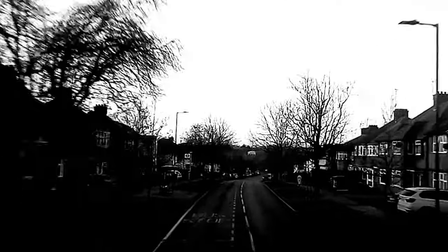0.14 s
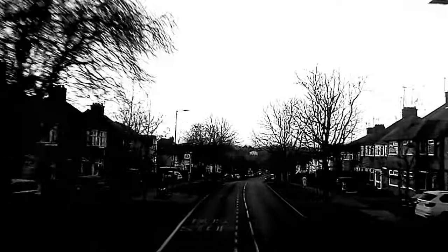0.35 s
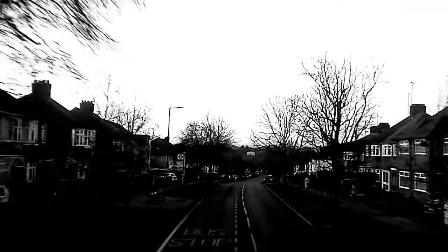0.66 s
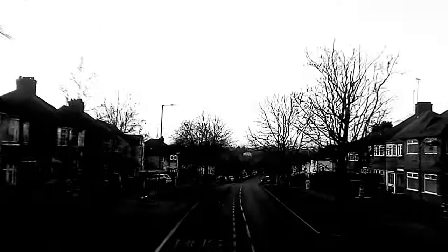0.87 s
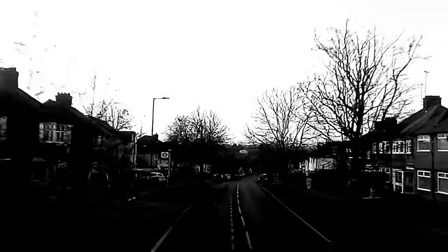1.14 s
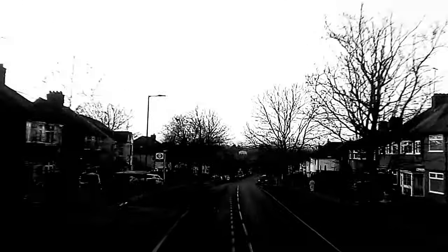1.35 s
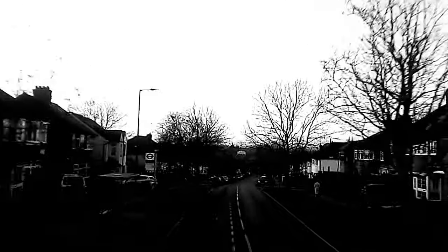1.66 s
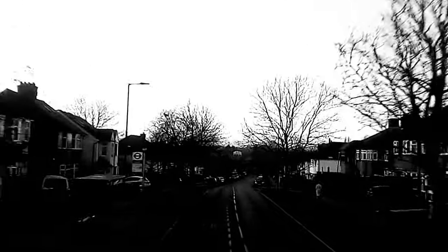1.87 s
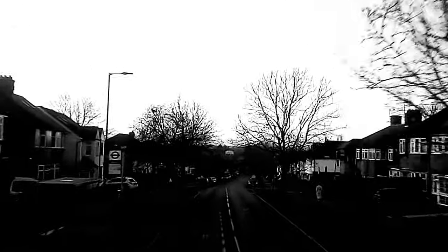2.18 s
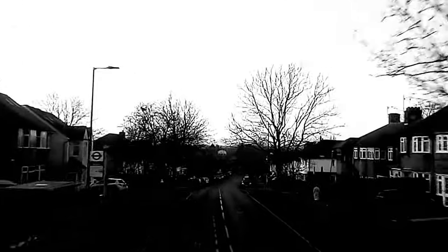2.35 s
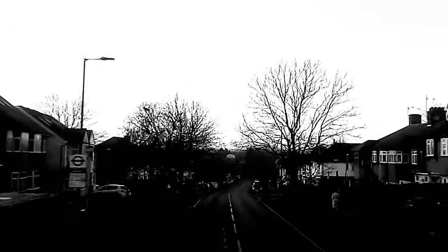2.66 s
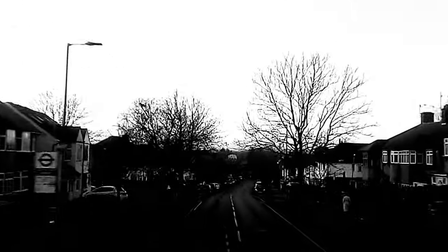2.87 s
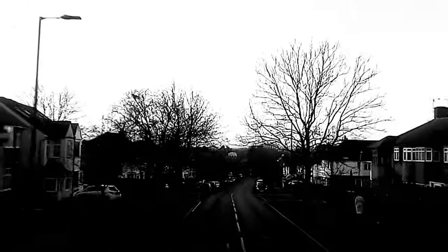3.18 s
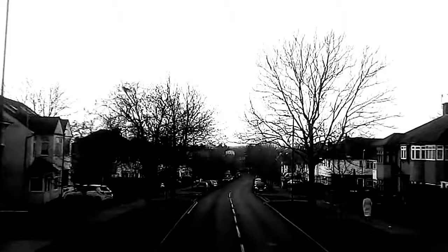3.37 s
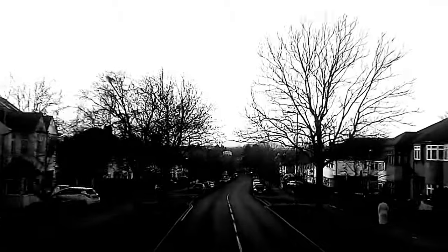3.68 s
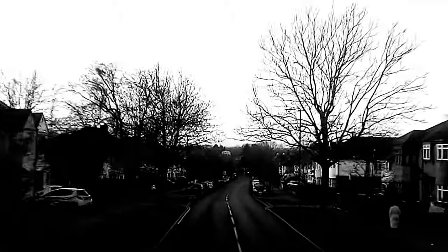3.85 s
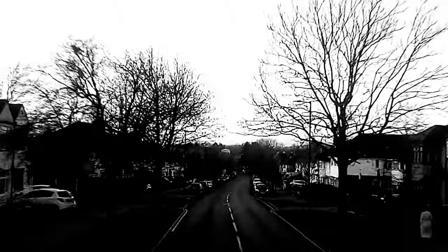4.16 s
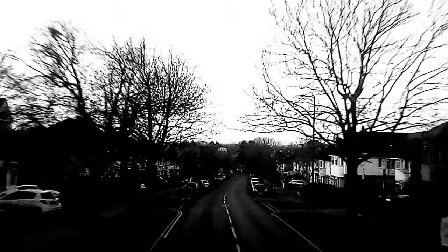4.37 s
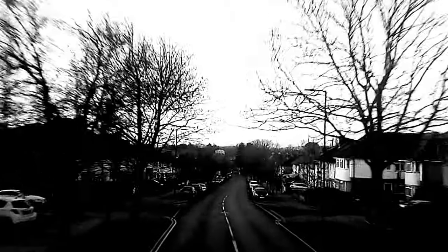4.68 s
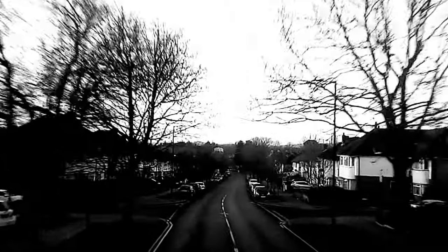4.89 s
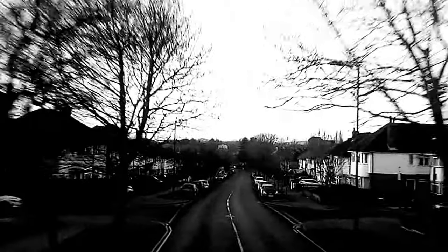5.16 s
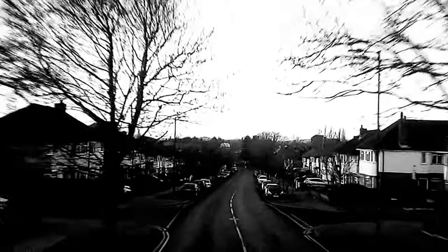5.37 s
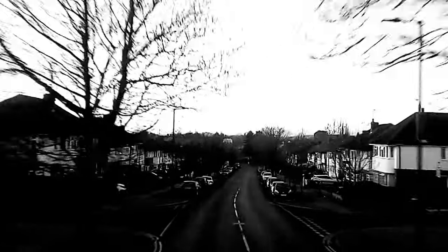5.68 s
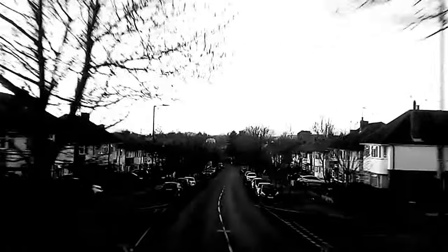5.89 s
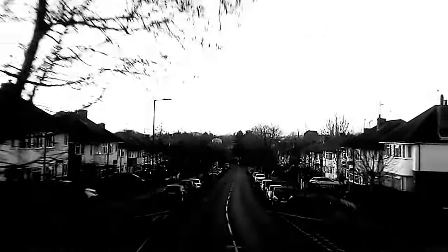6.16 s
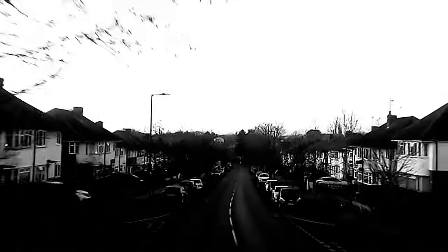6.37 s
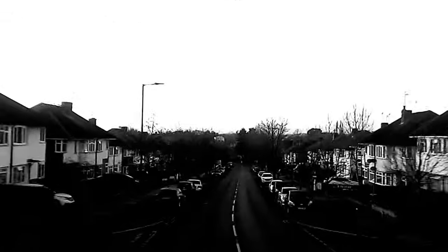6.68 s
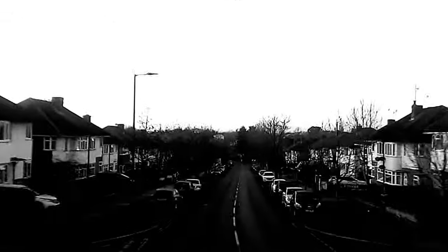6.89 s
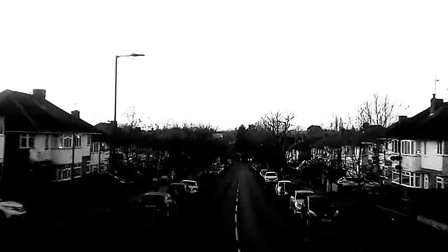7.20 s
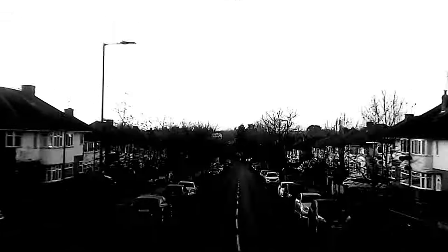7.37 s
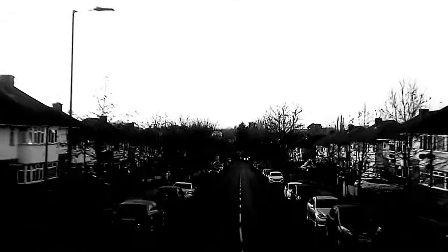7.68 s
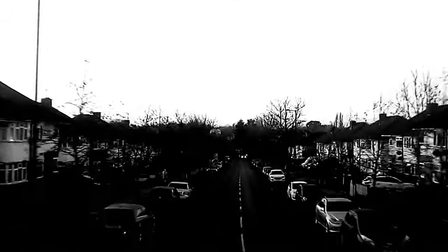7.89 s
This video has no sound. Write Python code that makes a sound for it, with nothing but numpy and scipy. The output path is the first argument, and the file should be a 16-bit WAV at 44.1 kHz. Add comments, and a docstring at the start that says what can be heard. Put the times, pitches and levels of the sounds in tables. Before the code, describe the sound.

A loose panel clatters in repeated bursts inside a moving double-decker bus, heard from the front seat of the upper deck. Each run of hollow knocks swells and fades, with light jiggling in the pauses. Underneath, the engine hums and the tyres rumble over rough asphalt. In the second half the drone grows and climbs a little as the bus gathers speed, and one bump brings a harder knock before the rattling carries on.

```python
"""Engine drone and tyre rumble upstairs in a double-decker bus gathering speed on a suburban road.
Firing orders sweep through body resonances under a gear hum; rough asphalt and bumps shake the cabin.
The body shudders about 12 times a second; strong shudders knock a loose panel against its frame,
echoing between the walls. Metal fittings chafe faintly over a thin hiss, and something ticks once."""
import sys
import numpy as np
from scipy import signal
from scipy.fft import rfft, irfft, next_fast_len
from scipy.io import wavfile
from scipy.ndimage import map_coordinates

SR = 44100
rng = np.random.default_rng(int(sys.argv[2]) if len(sys.argv) > 2 else 0)


def wav_record(signal):
    """Record a signal, one row per channel, as 16-bit PCM in the file named by sys.argv[1]."""
    frames = np.transpose(np.atleast_2d(signal))
    bounded = np.clip(frames, -1, 1)
    # unit amplitude maps onto the largest positive 16-bit level
    quanta = np.round(bounded * 32767).astype(np.int16)
    wavfile.write(sys.argv[1], SR, quanta)


N = 354563
T = np.arange(N) / SR

# engine firing rate: time_s, rate_hz
FIRING = [(0, 37.6), (1, 37.02), (2, 36.51), (3, 37.14), (4, 37.91), (4.5, 39.43), (5, 40.23), (5.5, 41.68),
          (6, 42.78), (6.5, 43.5), (8.04, 44.57)]


def amp(db):
    """dB to gain."""
    return 10 ** (np.asarray(db) / 20)


def unit(x):
    """Scale to rms 1."""
    return x / np.sqrt(np.mean(x ** 2) + 1e-20)


def along(points, hz):
    """Interpolate (freq_hz, value) rows on a log axis."""
    freq_hz, values = np.transpose(points)
    return np.interp(np.log(hz + 1), np.log(freq_hz + 1), values)


def curve(points):
    """Interpolate (time_s, value) rows per sample."""
    return np.interp(T, *np.transpose(points))


def wobble(rate_hz):
    """Smooth random curve, knots at rate_hz."""
    return map_coordinates(rng.standard_normal(int(N * rate_hz / SR) + 4), [T * rate_hz])


def filtered(x, response):
    """Apply the gain response(hz)."""
    size = next_fast_len(len(x) + 8192)
    return irfft(rfft(x, size) * response(np.fft.rfftfreq(size, 1 / SR)), size)[:len(x)]


def noise(spectrum, size=N):
    """Noise of rms 1, coloured by (freq_hz, density_db) rows."""
    return unit(filtered(rng.standard_normal(size), lambda hz: amp(along(spectrum, hz))))


def add(track, start_s, sound):
    """Mix a sound in at start_s."""
    part = track[max(0, round(start_s * SR)):][:len(sound)]
    part += sound[:len(part)]


def engine(waver_db=-0.3, gear_ratio=7.13, gear_waver_hz=1.066):
    """Firing orders grow with throttle and boom at body resonances; a gear hums above them."""
    # engine orders: firing_multiple, base_db
    orders = [(1, -47.5), (2, -41.5), (3, -54)]
    # throttle opening: time_s, load_db
    throttle = [(0, 0.5), (3.3, -1.5), (3.9, 3.5), (6.3, 4.5), (8.04, 1)]
    # body peaks and one null: centre_hz, half_width_hz, lift_db
    resonances = [(40.5, 0.6, -4), (42.7, 1.16, 13.5), (72.84, 0.67, 4.5), (81.5, 3.8, 6.5),
                  (128.55, 6.7, 14)]
    # gear hum: time_s, level_db
    gear = [(0, -44.5), (1.1, -46.5), (1.8, -49), (3.6, -50.5), (5, -41.5), (6.3, -50.5), (8.04, -61)]

    def tone(hz, db):
        level = np.sqrt(2) * amp(db + waver_db * wobble(8))
        return level * np.sin(2 * np.pi * (np.cumsum(hz) / SR + rng.random()))

    firing_hz, load_db = curve(FIRING), curve(throttle)
    drone = np.zeros(N)
    for multiple, base_db in orders:
        hz = round(multiple) * firing_hz
        lift_db = sum(db * np.exp(-((hz - centre) / width) ** 2) for centre, width, db in resonances)
        drone += tone(hz, base_db + load_db + lift_db)
    return drone + tone(gear_ratio * firing_hz + gear_waver_hz * wobble(7), curve(gear))


def road(rumble_db=-1.5, lumpy_db=1.12, boom_db=-35.5, boom_db_per_hz=0.29, tyres_db=-40):
    """Asphalt and bumps shake the body, the cabin air booms, tyres roar dully through the floor."""
    # asphalt roughness: time_s, level_db
    roughness = [(0.0, -33), (0.49, -36.5), (2.13, -38), (2.46, -35), (4.16, -36), (5.84, -34), (6.27, -35),
                 (6.65, -31), (7.39, -37), (8.04, -34.5)]
    # bumps under the wheels: start_s, level_db
    bumps = [(0.09, -36), (2.22, -30), (2.5, -32), (3.19, -30.5), (5.67, -28.5), (6.5, -23.5), (6.59, -34),
             (6.87, -36), (7.01, -34), (7.93, -34.5)]
    # spectra of body, cabin air and tyres: freq_hz, density_db
    body_spectrum = [(70, -21), (130, -3.5), (170, 1.5), (280, -2.5), (340, -3), (380, -1.5), (440, -16),
                     (800, -25), (2000, -79)]
    boom_spectrum = [(15, -8), (26, -4.5), (38, -2.5), (52, -0.5), (70, 5), (105, 4), (140, 0),
                     (200, -28.5), (500, -75.5)]
    tyre_spectrum = [(200, -7), (430, -2.5), (570, 2), (700, 1.5), (770, -3), (1000, -7.5), (1200, -13),
                     (1400, -18), (1900, -23), (3000, -50.5), (4200, -55), (5200, -43), (6600, -47),
                     (8500, -70.5)]
    rise_s, decay_s = 0.015, 0.042
    t, jolts = np.arange(SR // 2) / SR, np.zeros(N)
    jolt = np.minimum(t / rise_s, 1) * np.exp(-np.maximum(t - rise_s, 0) / decay_s)
    for start_s, db in bumps:
        add(jolts, start_s, amp(db) * jolt)
    rough_db, firing_hz = curve(roughness), curve(FIRING)
    swing_db = rough_db - rough_db.mean()
    speed_db = boom_db_per_hz * (firing_hz - firing_hz.mean())
    body = np.hypot(amp(rough_db + rumble_db + lumpy_db * wobble(14)), jolts) * noise(body_spectrum)
    boom = amp(boom_db + 1.1 * swing_db + speed_db) * noise(boom_spectrum)
    roar = amp(tyres_db + 0.96 * swing_db + 1.6 * wobble(9)) * noise(tyre_spectrum)
    return body + boom + roar


def fittings(level_db=-76, flutter_db=3.5, waver=0.011):
    """Small metal fittings chafe, each fluttering in level and wavering in pitch."""
    # metal resonances: pitch_hz, half_width_hz, gain_db
    bands = [(2460, 110, -2.5), (3420, 300, -3.5), (4030, 60, -7.5), (4290, 100, -0.5), (4520, 60, -10)]
    out = np.zeros(N)
    for hz, width_hz, db in bands:
        chafe = unit(filtered(rng.standard_normal(N), lambda f: 1 / (1 + (f / width_hz) ** 2)))
        carrier = np.sin(2 * np.pi * np.cumsum(hz * (1 + waver * wobble(16))) / SR)
        out += amp(level_db + db + flutter_db * wobble(22)) * unit(chafe * carrier)
    return out


def hiss(level_db=-81):
    """Faint steady hiss, strongest at the very top."""
    return amp(level_db) * noise([(1000, -7.5), (13800, -12.5), (14800, -4), (15700, 2), (16500, -38.5)])


def shudder(jiggle_hz=11.7, jiggle_db=-58, spread_db=2):
    """(start_s, strength_db) of each panel knock: single jolts, swelling runs, light jiggle in pauses."""
    # single jolts: start_s, strength_db
    singles = [(0.59, -52), (0.7382, -46), (1.1631, -38.5), (2.328, -36.5), (4.1754, -37.5), (4.27, -47.5),
               (4.6495, -41.5), (4.7671, -42.5), (6.4923, -24), (7.2953, -41), (7.5104, -41),
               (7.5895, -44.5), (7.7882, -42)]
    # runs of knocks: start_s, count, first_gap_s, gap_shrink_s, crest_index, crest_db, drop_db
    runs = [(0.0128, 5, 0.079, -0.00089, 0.67, -26, 2.06), (0.8597, 4, 0.084, -0.0013, 1.8, -31.5, 1.4),
            (1.6338, 4, 0.079, -0.0038, 1.5, -38, 1.5), (2.4231, 6, 0.084, 0.0017, 0.63, -27, 1.6),
            (2.933, 9, 0.0895, 0.0027, 3.36, -26.5, 1.57), (3.6968, 4, 0.088, 0.0006, 1.07, -31, 3),
            (4.3735, 4, 0.081, 0.0128, 0.95, -35, 2.5), (4.9677, 5, 0.09, 0.0022, 2.14, -30, 4.3),
            (5.558, 7, 0.0873, 0.0012, 2.83, -26.5, 1.53), (6.1463, 4, 0.0845, -0.0042, 1.3, -31.5, 0.2),
            (6.5688, 4, 0.096, 0.0095, 0.091, -25, 1.46), (6.9204, 5, 0.076, 0.00011, 0.93, -31.5, 0.2),
            (7.841, 3, 0.091, 0.014, 0.45, -29, 5)]
    crest_shape = 1.36  # 1 pointed, 2 round
    knocks = list(singles)
    for start_s, count, gap_s, shrink_s, crest, crest_db, drop_db in runs:
        k = np.arange(round(count))
        times_s = start_s + gap_s * k - shrink_s * k * (k - 1) / 2
        knocks += zip(times_s, crest_db - drop_db * np.abs(k - crest) ** crest_shape)
    slip, scatter = rng.standard_normal((100, 2)).T
    beats_s = (np.arange(len(slip)) + slip / 10) / jiggle_hz
    nearest_knock_s = np.abs(beats_s[:, None] - np.transpose(knocks)[0]).min(axis=1)
    idle = nearest_knock_s >= 1 / jiggle_hz
    return knocks + list(zip(beats_s[idle], jiggle_db + spread_db * scatter[idle]))


def dense_modes(spectrum, size, hold_s=0.013):
    """Close panel and cabin modes as noise: held by first reflections, then fading band by band."""
    # cabin decay: freq_hz, t60_s
    cabin = [(200, 0.32), (1000, 0.64), (3500, 0.41), (7000, 0.079), (11000, 0.15)]
    hz, t, bands = signal.stft(noise(spectrum, size), SR, nperseg=256)
    fade = amp(-60 * np.maximum(t - hold_s, 0) / along(cabin, hz)[:, None])
    return signal.istft(bands * fade, SR, nperseg=256)[1][:size]


def panel_rattle(hollow_db=4, clack_db=-15.8, ring_db=-19, sizzle_db=-20, scatter_db=3.5):
    """A loose panel hits its frame at the same spot each time, so the knocks sound alike."""
    # main panel modes: pitch_hz, gain_db, t60_s
    panel_modes = [(221, -1, .3), (308, -4, .3), (774, 0, .3), (874, 1, .25), (974, -8, .3), (1044, -5, .3),
                   (1155, -6, .3), (1217, -8, .3), (1370, -7, .2), (1416, -2, .25), (1577, -8, .25),
                   (1772, -6, .2), (1876, -8, .2), (2368, -7, .2), (2938, -14, .28), (3186, -11, .25),
                   (3420, -11, .25), (3671, -8, .28), (3789, -13, .28), (4393, -14, .3), (4910, -20, .25),
                   (6030, -19, .2), (6573, -20, .18), (6729, -21, .18), (7560, -30, .14), (8400, -28, .06),
                   (10170, -37, .12)]
    # paths via walls and roof: delay_s, gain_db
    echoes = [(.004, 0), (.01432, -1), (.02224, 0), (.02996, -5), (.03057, -9), (.0412, -7)]
    # spectra of the flexing pulse, the clack and a hard knock's bright edge: freq_hz, density_db
    hollow_spectrum = [(150, -30), (300, -17), (520, -11), (640, -5), (790, 0), (900, 0), (1080, -10),
                       (1300, -21), (1600, -27), (3000, -55), (6000, -100)]
    clack_spectrum = [(200, -17.5), (600, -1.5), (1200, 7.5), (1800, 7), (2100, 0), (2450, 4.5),
                      (2850, -1.5), (3600, 2.5), (4300, -2.5), (5000, -16), (6500, -31), (7200, -34.5),
                      (10200, -38), (12000, -58.5)]
    sizzle_spectrum = [(3800, -16.5), (4800, 2), (5900, 0.5), (6250, 0.5), (6700, -8.5), (7150, -10.5),
                       (7550, -9.5), (8000, -21.5), (8400, -16), (8800, -27), (10200, -23.5), (11500, -41)]
    size = SR // 4
    t, out = np.arange(size) / SR, np.zeros(N)
    common_clack = dense_modes(clack_spectrum, size)
    sizzle = dense_modes(sizzle_spectrum, size) * (1 - np.exp(-t / 0.03))  # blooms late, via the walls
    delay_s, echo_db = np.transpose(echoes)
    arrivals = np.bincount(np.round(delay_s * SR).astype(int), amp(echo_db), size)
    hollow = filtered(arrivals, lambda hz: amp(along(hollow_spectrum, hz)))
    hollow *= amp(hollow_db) / np.abs(hollow).max()
    # the clack bites at once and flares with each reflection
    bite = 0.088 * np.exp(-t / 0.0045)
    flare = 0.27 * amp(echo_db) @ np.exp(-((t - delay_s[:, None]) / 0.0051) ** 2)
    clack_envelope = amp(clack_db) * (1 + bite + flare)
    # modes in phase at the first arrival
    mode_hz, mode_db, t60_s = np.transpose(panel_modes)[:, :, None]
    modes = np.cos(2 * np.pi * mode_hz * (t - delay_s[0]))
    modes *= amp(mode_db - 60 * t / t60_s) * (1 - np.exp(-t / 0.005))
    contact = 1 - np.exp(-(t / 0.0014) ** 2)
    hardness, usual_db = 0.95, -31  # harder knocks are brighter
    for start_s, db in shudder():
        clack = clack_envelope * (common_clack + 0.75 * dense_modes(clack_spectrum, size))
        ring = amp(ring_db + rng.normal(0, scatter_db, len(modes))) @ modes
        top = amp(sizzle_db + hardness * (db - usual_db)) * sizzle
        add(out, start_s, amp(db) * (hollow + clack + ring + top) * contact)
    return out


def tick(start_s=5.599, level_db=-54, t60_s=0.05, rise_s=0.001):
    """Something small and hard gives one bright tick."""
    # ringing modes: pitch_hz, gain_db
    modes = [(6150, 0), (6600, -12), (8400, -14), (10550, -18), (11500, -16)]
    t, out = np.arange(SR // 8) / SR, np.zeros(N)
    ring = sum(amp(db) * np.sin(2 * np.pi * hz * t) for hz, db in modes)
    add(out, start_s, ring * amp(level_db - 60 * t / t60_s) * (1 - np.exp(-t / rise_s)))
    return out


def scene():
    """Mono mix at the front seat."""
    return (engine() + road() + panel_rattle() + fittings() + tick() + hiss())[None]


def record(dry):
    """Brick-wall low-pass."""
    cutoff_hz = 15750
    return np.array([filtered(channel, lambda hz: hz < cutoff_hz) for channel in dry])


dry = scene()
out = record(dry)
wav_record(out)
```